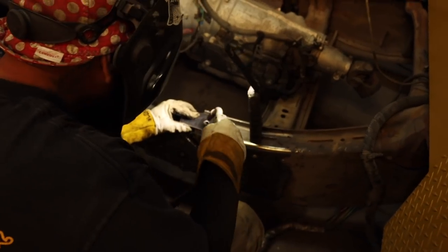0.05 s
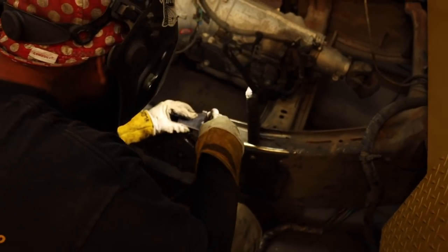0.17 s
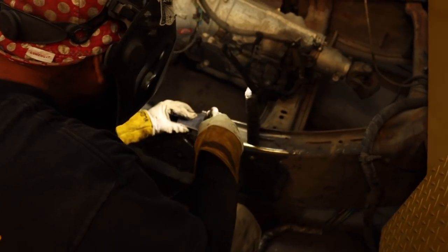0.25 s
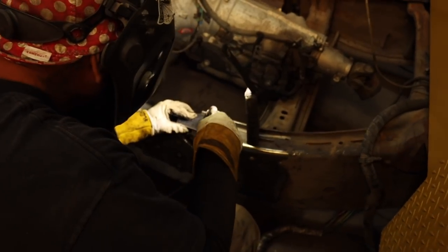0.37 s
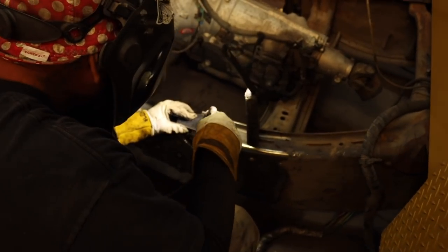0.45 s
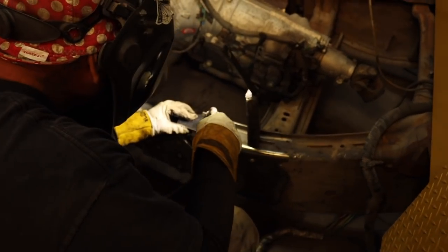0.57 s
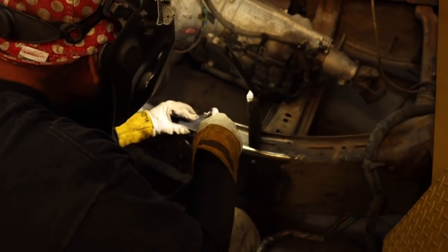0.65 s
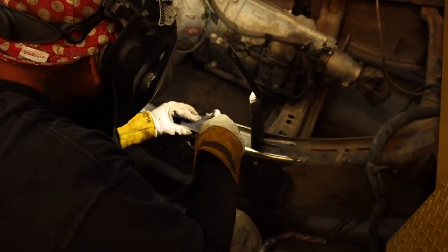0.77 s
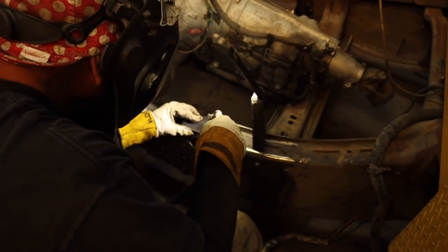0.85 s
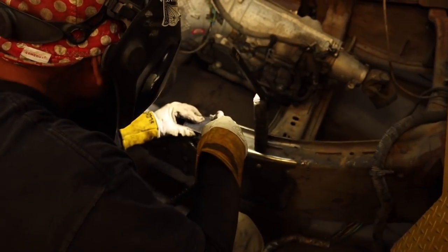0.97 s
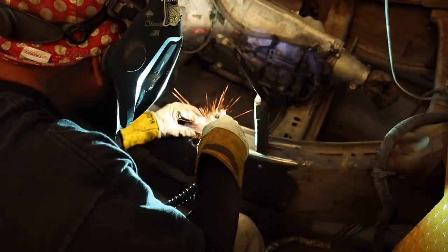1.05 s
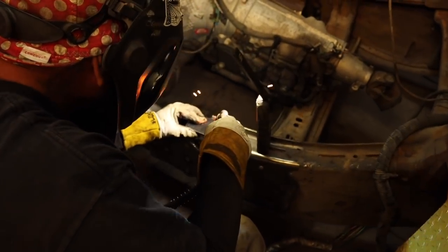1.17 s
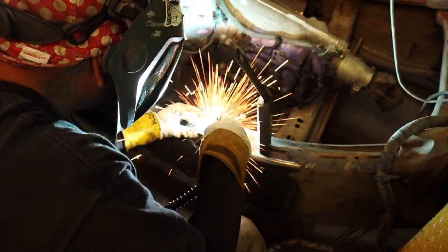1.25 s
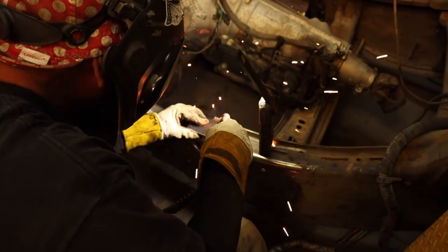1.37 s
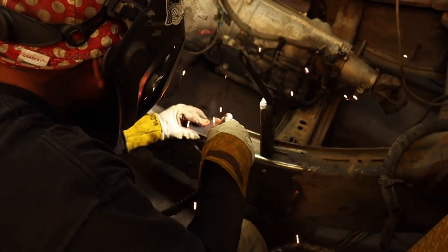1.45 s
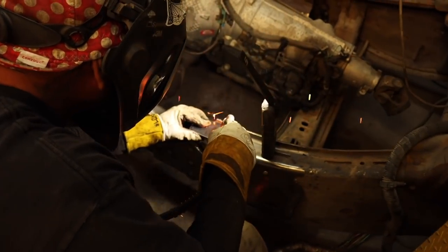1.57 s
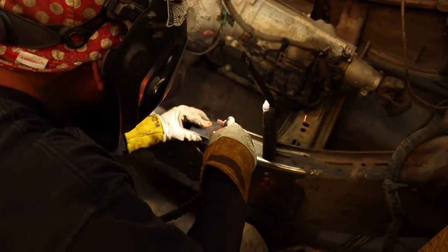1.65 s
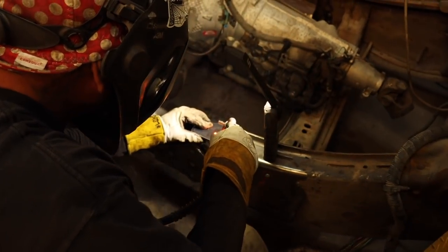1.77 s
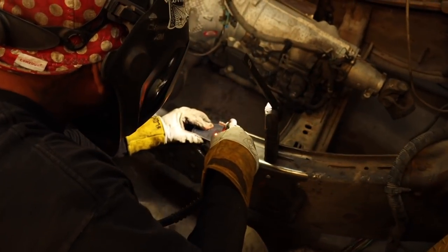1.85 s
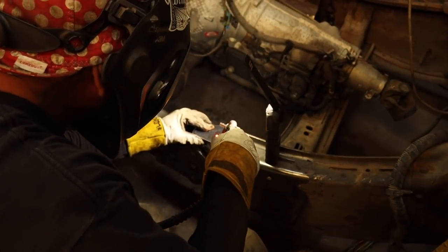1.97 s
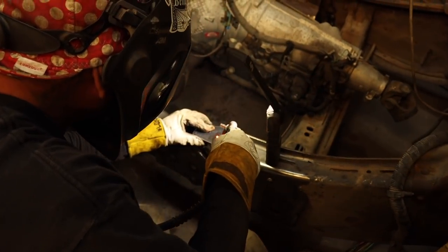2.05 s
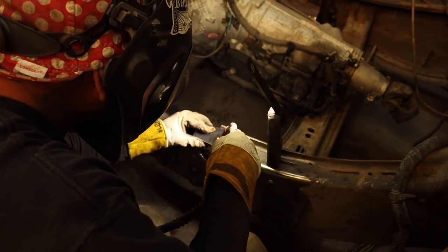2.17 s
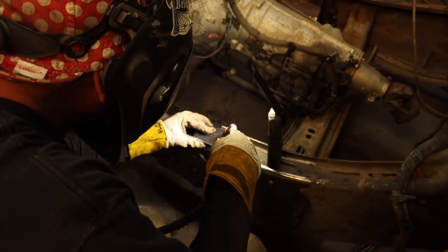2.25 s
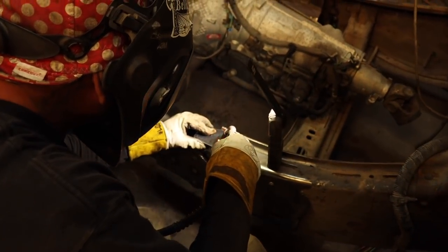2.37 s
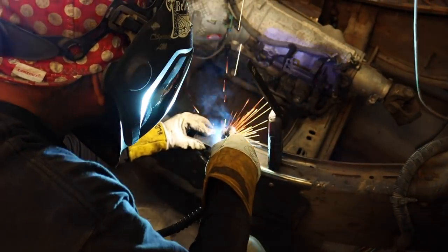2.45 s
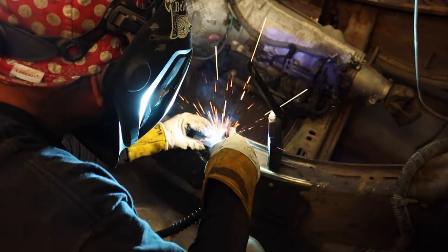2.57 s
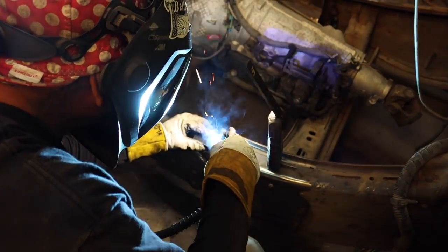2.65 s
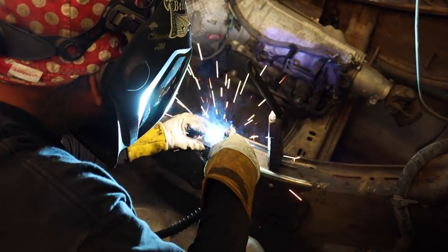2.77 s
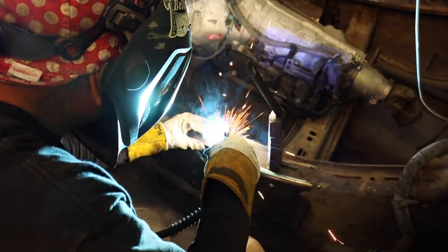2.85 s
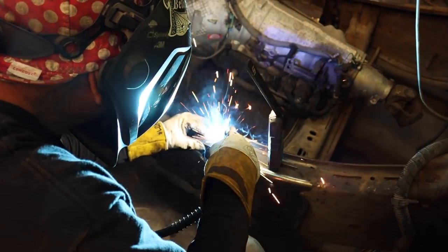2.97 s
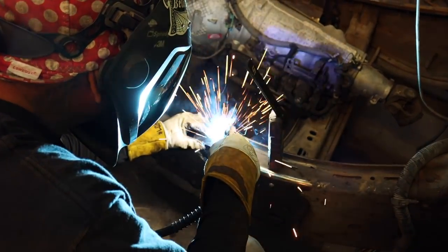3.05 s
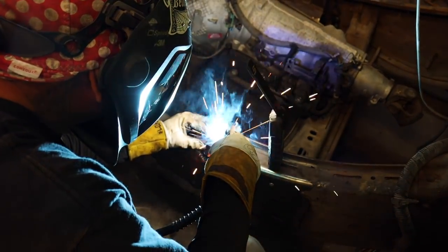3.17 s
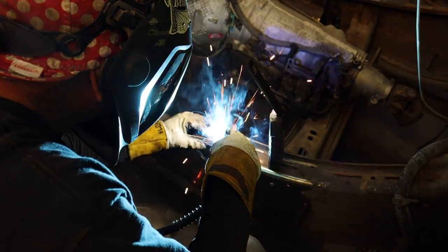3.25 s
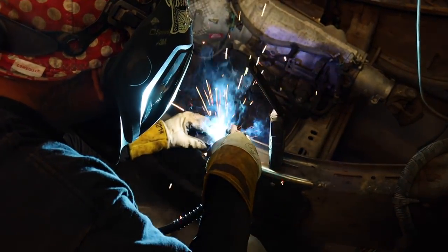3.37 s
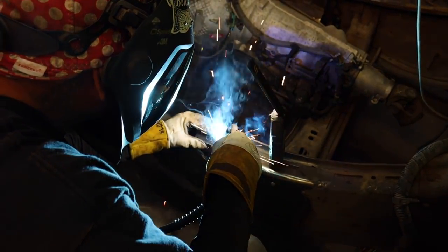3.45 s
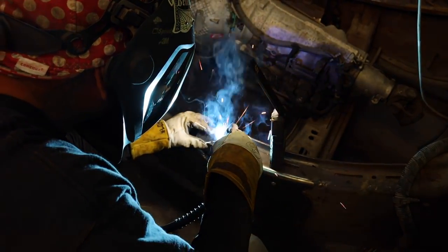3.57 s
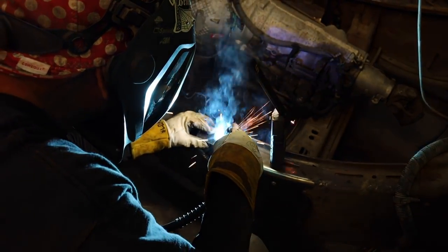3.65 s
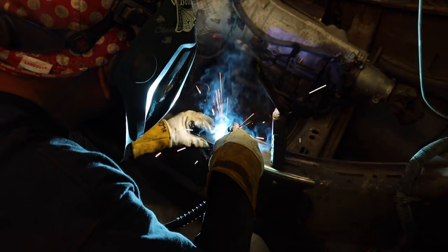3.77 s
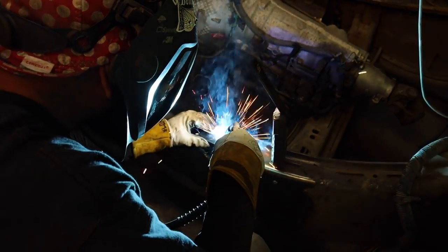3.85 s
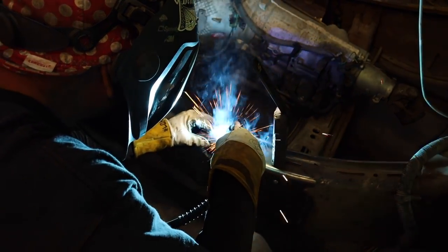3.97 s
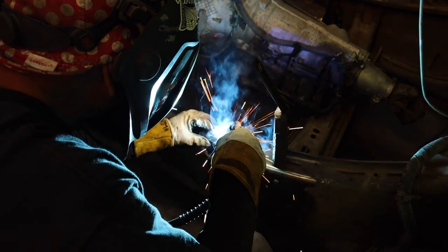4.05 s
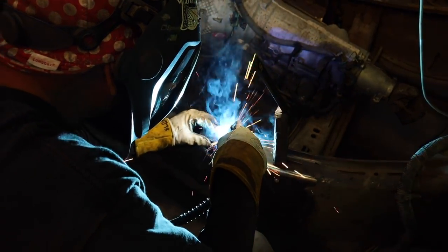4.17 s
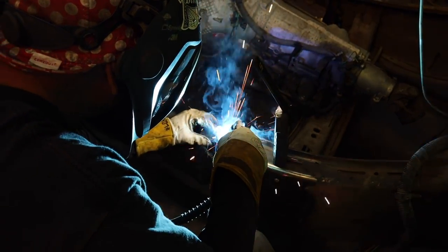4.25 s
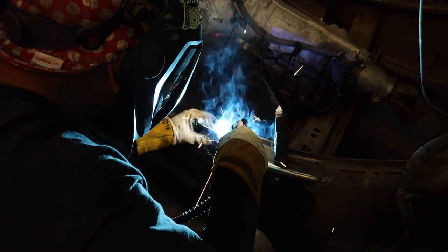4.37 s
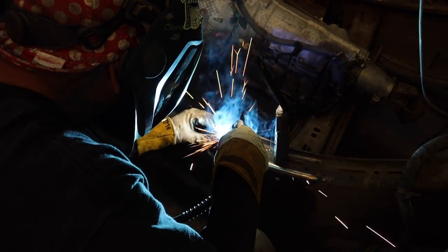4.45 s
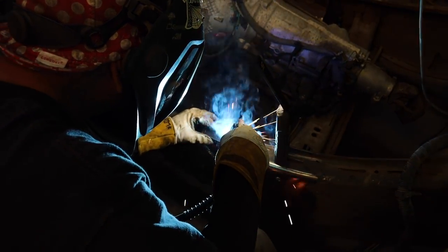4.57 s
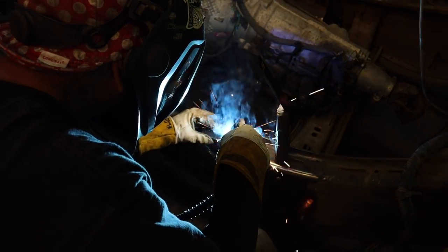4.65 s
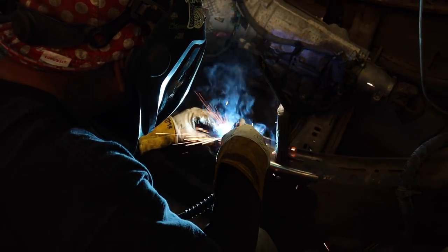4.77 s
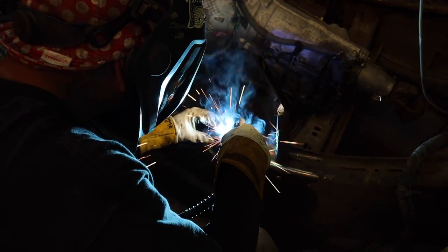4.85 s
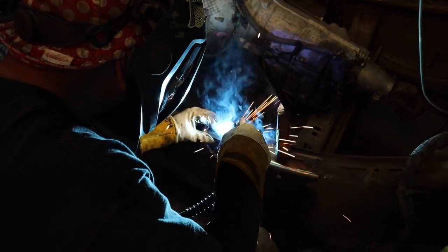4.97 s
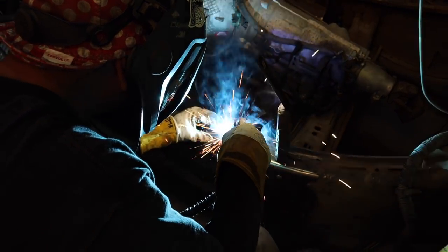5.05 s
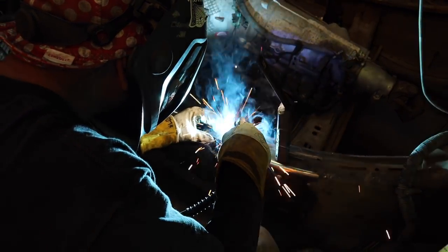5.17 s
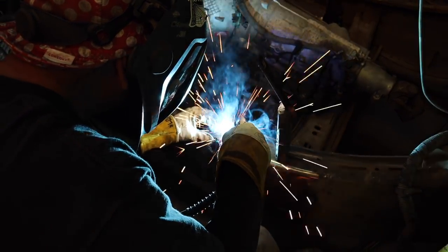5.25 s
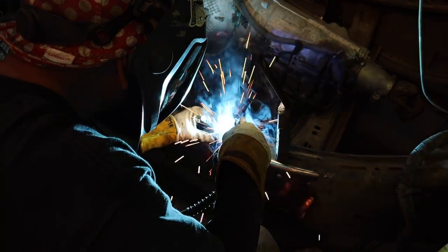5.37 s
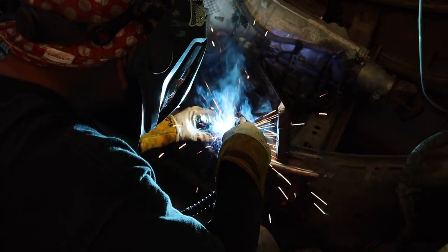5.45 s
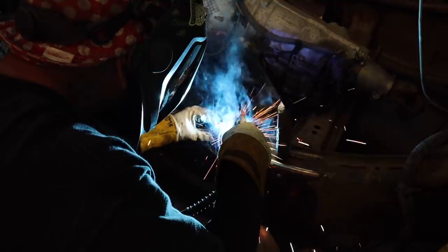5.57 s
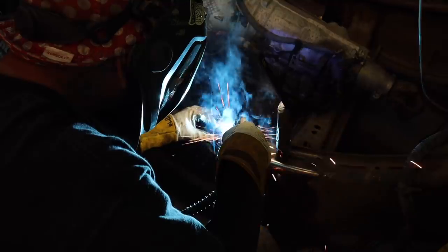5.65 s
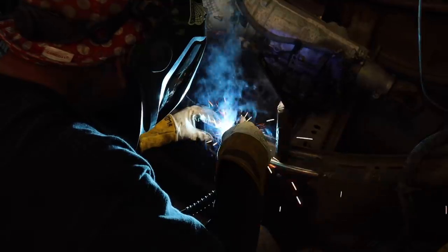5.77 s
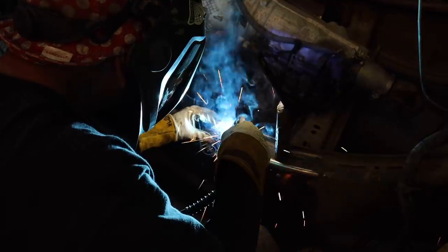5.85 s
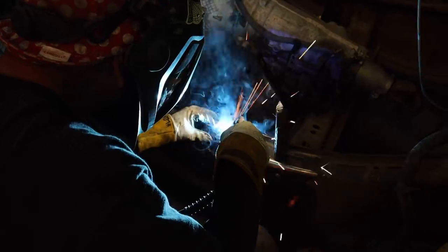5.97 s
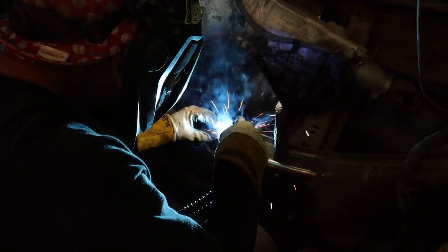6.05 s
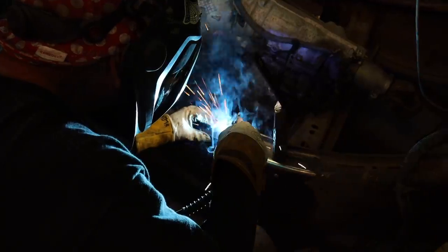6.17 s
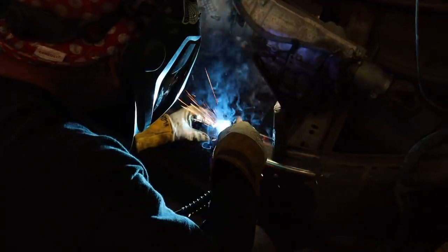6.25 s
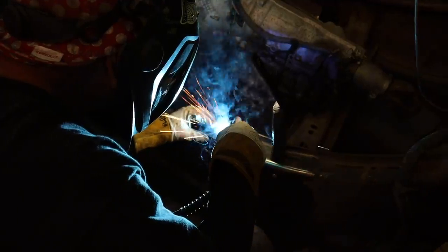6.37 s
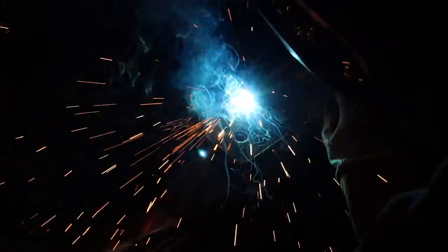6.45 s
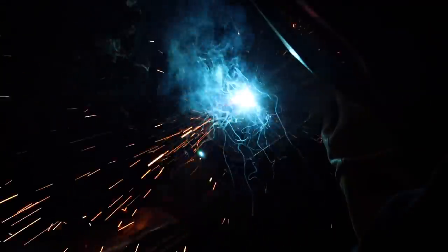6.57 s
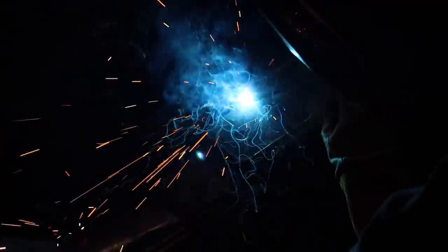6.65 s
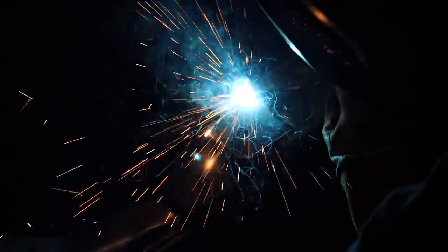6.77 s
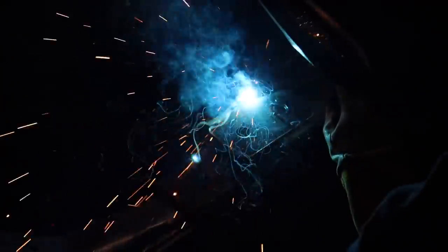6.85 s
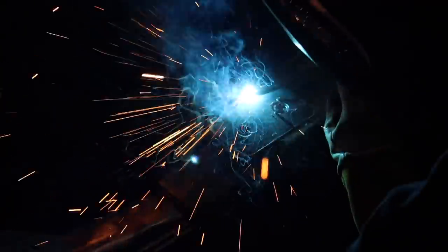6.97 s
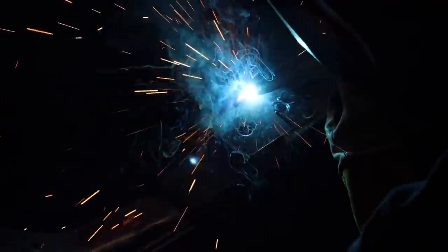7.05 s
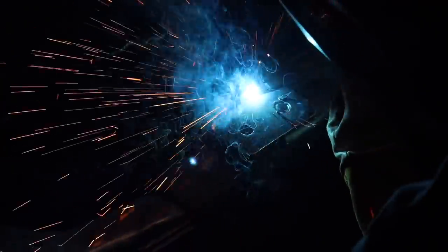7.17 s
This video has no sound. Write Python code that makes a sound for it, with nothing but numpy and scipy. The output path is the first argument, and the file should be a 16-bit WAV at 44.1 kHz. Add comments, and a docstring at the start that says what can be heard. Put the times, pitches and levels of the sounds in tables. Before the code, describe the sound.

An arc welder hisses and pops in two false starts, then crackles and sizzles steadily on steel, close by, over a faint fan.

```python
"""A garage: wire-feed arc welding on a steel vehicle frame, close by, over a humming fan.
Gas hisses, two false starts pop and sizzle out, then the arc catches. Each drop of wire shorts and
blows apart with a crack; the arc frizzles in between. The cracks ring between the steel parts and
overload the microphone. The weld is heard from beside the welder, at the end facing the arc."""
import sys
import numpy as np
from scipy import signal
from scipy.fft import rfft, irfft
from scipy.io import wavfile
from scipy.ndimage import uniform_filter1d

SR = 44100
rng = np.random.default_rng(int(sys.argv[2]) if len(sys.argv) > 2 else 0)


def wrap_up_sound(samples):
    """Save the sound to the file named by the first command line argument, as 16-bit audio."""
    columns = np.atleast_2d(samples).T
    # keep every value between -1 and 1, then stretch to whole-number steps
    tamed = np.clip(columns, -1, 1)
    steps = np.round(tamed * 32767).astype(np.int16)
    wavfile.write(sys.argv[1], SR, steps)


N = 317520
T = np.arange(N) / SR
CATCH_S, TURN_S = 2.5, 6.487  # arc catches; listener faces it

# false starts and big drops: (time [s], strength [dB])
BIG_POPS = [(1.0966, 17.5), (1.2922, 25.5), (2.4694, 22), (2.4917, 19.5), (2.5796, 17), (2.6446, 19.5),
            (2.7199, 23), (2.7378, 21), (2.7581, 21), (2.7962, 13.5), (2.8465, 20), (2.88, 21.5),
            (2.8933, 21), (2.961, 15), (2.9981, 20), (3.023, 21), (3.0467, 18.5), (3.0874, 19),
            (3.1628, 14.5), (3.2299, 21), (3.271, 20), (3.3356, 15), (3.3885, 18.5), (3.4787, 14.5),
            (3.5552, 9), (3.6366, 11.5), (3.665, 17.5), (3.8127, 15), (3.8327, 16.5), (3.8641, 19),
            (3.906, 16), (4.1817, 18.5), (4.2873, 19.5), (4.3289, 20.5), (4.4167, 19), (4.47, 25),
            (4.5477, 16), (4.688, 17), (4.7126, 20), (4.7424, 17.5), (4.8649, 13), (5.0042, 20),
            (5.179, 12.5), (5.2045, 13.5), (5.5211, 17), (5.6367, 20.5), (5.9582, 22), (6.0247, 18.5),
            (6.1333, 19), (6.241, 17.5), (6.3056, 18.5), (6.3884, 21.5), (6.4319, 18), (6.4773, 15),
            (6.8601, 20.5), (7.0515, 20)]
# wire feed: (time [s], drop rate [1/s], crack strength [dB])
WIRE_FEED = [(2.6, 135, 11), (2.94, 120, 12), (3.01, 42, 14), (3.11, 110, 11), (3.35, 66, 13),
             (3.62, 43, 9.5), (3.94, 40, 9), (4.059, 60, 11), (4.43, 68, 13.5), (4.62, 70, 11),
             (4.8, 52, 16), (5.12, 62, 9), (5.58, 72, 12), (5.82, 72, 13), (6.16, 62, 14.5), (6.27, 46, 16),
             (6.45, 46, 13.5), (6.55, 72, 11.5), (6.7, 76, 10.5), (6.79, 120, 11.5), (6.95, 92, 12),
             (7.2, 76, 12)]
# wire stalls: (start [s], end [s], frizzle change [dB])
WIRE_STALLS = [(2.495, 2.564, -15), (2.649, 2.7, -9), (2.8, 2.826, -5), (2.848, 2.878, -1),
               (3.166, 3.22, 2.5), (4.51, 4.545, -0.5), (4.826, 4.863, -3)]
# spatter landing: (time [s], strength [dB])
SPATTER_TICKS = [(1.234,-11.5), (1.266,-18), (1.336,-7), (2.112,-31)]
# source spectra: (frequency [Hz], relative density [dB])
ARC_BESIDE_SPECTRUM = [(60,-4), (300,-1), (550,0.5), (1000,1), (5000,0), (9000,2), (16000,-3.5)]
ARC_FACING_SPECTRUM = [(25,-12), (85,11.5), (400,0), (1400,2), (5000,-6), (8000,4.5), (16000,3.5)]
SPARK_SPECTRUM = [(500,-10.5), (1000,-1), (1500,-9.5), (2000,-11), (3000,0.5), (4200,0), (5300,-8),
                  (7500,-9), (11000,-25.5), (16000,-38.5)]
GAS_SPECTRUM = [(300, -29.5), (900, -3.5), (1200, -2), (1500, 6.5), (2000, -3), (2500, -3.5), (4000, 0.5),
                (6300, -2.5), (9000, -12), (12000, -19.5), (16000, -26)]
FAN_SPECTRUM = [(20,-24.5), (32,-22), (60,-15.5), (100,-20.5), (170,-12.5), (280,-14), (380,-15), (520,-13),
                (900,-8.5), (1400,-22), (2000,-26), (3200,-31.5), (5000,-43), (8000,-50.5), (16000,-52)]
# resonances from arc to microphone: (frequency [Hz], width [Hz], relative level [dB])
BESIDE_MODES = [(100,210,-33.5), (619,220,-21), (1200,243,-12), (1533,240,-10.5), (1823,154,-13),
                (2330,270,-9), (2775,170,-10.5), (3230,133,-7.5), (3678,156,-8.5), (4090,250,-13.5),
                (4614,297,-6), (4800,212,-3.5), (5030,285,-2), (5450,493,-6.5), (6010,197,-8),
                (6147,185,-12.5), (7417,315,-11), (7700,360,-11), (8670,310,-13), (9210,230,-14.5),
                (9800,284,-14.5), (10640,520,-17), (10930,400,-15.5), (12000,650,-16), (14100,680,-20.5),
                (15070,430,-26)]
FACING_MODES = [(120,260,-18.5), (1000,300,-11.5), (1379,280,-11.5), (1800,130,-8.5), (2800,190,-6.5),
                (3500,430,-13.5), (3735,150,-6.5), (4320,200,-9.5), (4820,160,-4.5), (5220,220,-1),
                (5700,540,-5), (6300,390,-9.5), (6880,780,-14.5), (8900,770,-14), (9740,260,-9),
                (10740,510,-14), (11770,700,-16), (13200,810,-13), (14450,440,-18), (15100,510,-15.5)]
# reflection spectra: (frequency [Hz], relative density [dB])
BESIDE_ECHO_SPECTRUM = [(60,-15.5), (400,-13), (900,-3), (1700,-5), (3400,1), (5300,0), (7000,-5.5),
                        (11000,-6), (16000,-19.5)]
FACING_ECHO_SPECTRUM = [(60, 1), (400, -4), (900, -5.5), (1800, -9), (3400, 3), (5400, 5.5), (7000, -4),
                        (11000, -2), (16000, -9)]
# the background sinks after the pops and under the arc: (time [s], gain [dB])
FAN_GAIN = [(1.05, 3), (1.13, -4), (1.35, -1.5), (1.5, 1.5), (2.42, 1), (2.48, -5), (3.5, -7), (3.8, -1.5),
            (4.2, -7)]
# brief dips in overall level: (time [s], half width [s], gain [dB])
LEVEL_DIPS = [(1.085, 0.0055, -15), (1.324, 0.0086, -16), (1.445, 0.0043, -18.5), (2.446, 0.0055, -18)]


def cracks(burst_s, strength_db, touch_s, crack_db=1.8, touch_db=-15.5):
    """The wire ticks on touching the pool; the bridge then bursts and spits, longer on cold steel."""
    bursts = impulses(burst_s, undb(strength_db + crack_db))
    touch_gain = undb(np.minimum(strength_db, 14) + touch_db) * (burst_s > CATCH_S)
    touches = impulses(touch_s, touch_gain) * undb(3.9 * rng.standard_normal(N))
    short_spit = spit(bursts, decay_s=.0011, gain_db=-10.5)
    cold_spit = spit(bursts * (T < CATCH_S), decay_s=.011, gain_db=-15)
    return touches - bursts + short_spit + cold_spit


def drops(big_drop_cycles=1.35, warm_up_s=.8, scatter_db=1.7, restrike_s=.012, max_drops=64):
    """Burst times [s] and strengths [dB]: small drops fall unevenly between the big pops."""
    cycles = np.cumsum(feed(T)[0]) / SR
    edges_s = [s for s, _ in BIG_POPS if s > CATCH_S] + [T[-1]]
    draws = rng.standard_normal((len(edges_s), 2, max_drops))
    bursts = list(BIG_POPS)
    for start_s, end_s, (wait, strength) in zip(edges_s, edges_s[1:], draws):
        first, last = np.interp([start_s, end_s], T, cycles)
        count = max(int(round(last - first - big_drop_cycles)), 0)
        jitter = .14 + .35 * np.exp((CATCH_S - start_s) / warm_up_s)  # steadies as the steel heats
        grown = np.cumsum(np.append(np.exp(jitter * wait[:count]), big_drop_cycles))
        times_s = np.interp(first + (last - first) * grown[:-1] / grown[-1], cycles, T)
        levels_db = feed(times_s)[1] + scatter_db * strength[:len(times_s)]
        bursts += [(s, db) for s, db in zip(times_s, levels_db)
                   if not any(stop < s < resume + restrike_s for stop, resume, _ in WIRE_STALLS)]
    return np.transpose(bursts)


def feed(times_s):
    """Drop rate [1/s] and crack strength [dB] set by the wire feed."""
    at_s, rate_hz, strength_db = np.transpose(WIRE_FEED)
    return np.interp(times_s, at_s, rate_hz), np.interp(times_s, at_s, strength_db)


def spit(bursts, decay_s, gain_db):
    """A fading rush of noise behind each burst."""
    decay = np.exp(-2 / (decay_s * SR))
    power = signal.lfilter([1 - decay], [1, -decay], bursts ** 2 + 1e-18)
    return undb(gain_db) * np.sqrt(power) * rng.standard_normal(N)


def thumps(burst_s, strength_db, growth=2.77, cutoff_hz=85):
    """A low thump under each crack, growing steeply with its strength."""
    pulses = impulses(burst_s, undb(24 + growth * (np.minimum(strength_db, 21) - 20.5)))
    return butterworth(pulses + 1e-18, 1, cutoff_hz)


def arc(burst_s, touch_s, ripple_hz=120, flutter_db=2, shorted_db=-7):
    """Grainy frizzle; throbs with the rectified mains, drops while the wire is shorted."""
    grains = grainy_noise(spread_db=5.5)
    beside, facing = colour(grains, ARC_BESIDE_SPECTRUM), colour(grains, ARC_FACING_SPECTRUM)
    frizzle = np.where(T < TURN_S, beside, facing)
    ones = np.ones(len(burst_s))
    shorted = np.cumsum(impulses(touch_s, ones) - impulses(burst_s, ones))
    throb = 1 + .28 * np.sin(2 * np.pi * ripple_hz * T)
    return frizzle * arc_gain() * throb * undb(flutter_db * drift(220) + shorted_db * shorted)


def arc_gain(offset_db=-38, db_per_octave=4.5, facing_db=6, fade_s=.008):
    """Frizzle grows with drop strength and rate, and with the arc in view; most stalls cut it."""
    rate_hz, strength_db = feed(T)
    feed_db = strength_db + db_per_octave * np.log2(rate_hz / rate_hz.mean())
    stall_db = sum(db * (ramp(start, fade_s) - ramp(end, fade_s)) for start, end, db in WIRE_STALLS)
    return undb(offset_db + feed_db + stall_db + facing_db * (T >= TURN_S)) * (T > CATCH_S)


def spatter():
    """Spatter lands with small ticks."""
    times_s, strength_db = np.transpose(SPATTER_TICKS)
    return impulses(times_s, undb(strength_db))


def sparks(peak_s=1.325, attack_s=.02, peak_db=-23.5, fade_db_per_s=51, cool_s=.15):
    """Burning droplets sizzle after the second false start; treble dies first as they cool."""
    fizz = colour(grainy_noise(spread_db=4), SPARK_SPECTRUM)
    dull = butterworth(fizz, 3, 4800)
    age_s = np.maximum(T - peak_s, 0)
    envelope = ramp(peak_s - attack_s, attack_s) * undb(peak_db - fade_db_per_s * age_s)
    return (dull + np.exp(-age_s / cool_s) * (fizz - dull)) * envelope


def gas():
    """Shielding gas hisses from the nozzle on two trigger pulls."""
    flow = gas_flow(.938, hold_s=.14, level_db=-29.5) + gas_flow(2.367, hold_s=.086, level_db=-30.5)
    return colour(rng.standard_normal(N), GAS_SPECTRUM) * flow * undb(.64 * drift(90))


def gas_flow(start_s, hold_s, level_db, attack_s=.05, release_s=.01, trickle_s=.2, trickle_db=-12.5):
    """Envelope of one pull: a rush, then a trickle."""
    rush = 1 - ramp(start_s + hold_s, release_s)
    trickle = undb(trickle_db) * (1 - ramp(start_s + hold_s + trickle_s, release_s))
    return undb(level_db) * ramp(start_s, attack_s) * np.maximum(rush, trickle)


def garage(x, modes, spectrum, bounce_s, bounce_db, frame_db, room_db):
    """Direct ring, a bright bounce off steel, quick echoes off frame and floor, then the room."""
    direct = steel_ring(modes)
    response = undb(frame_db) * echoes(spectrum, start_s=.00065, t60_s=.035, spread_db=3.5)
    response += undb(room_db) * echoes(spectrum, start_s=.005, t60_s=.32, spread_db=2.5)
    lag = int(bounce_s * SR)
    response[:len(direct)] += direct
    response[lag:lag + len(direct)] += undb(bounce_db) * butterworth(direct, 2, 6500, "high")
    return signal.oaconvolve(x, response)[:N]


def steel_ring(modes, size=4096):
    """Impulse response of the resonances between the steel parts; energy 1."""
    f_hz = np.fft.rfftfreq(size, 1 / SR) + 1
    transfer = sum((-1) ** k * undb(db) / (1 + 1j * (f_hz / hz - hz / f_hz) * hz / width_hz)
                   for k, (hz, width_hz, db) in enumerate(modes))
    cepstrum = irfft(np.log(abs(transfer)))
    cepstrum[1:size // 2] *= 2  # fold to minimum phase: sharp front
    cepstrum[size // 2 + 1:] = 0
    response = irfft(np.exp(rfft(cepstrum)))[:size // 2]
    return response / np.linalg.norm(response)


def echoes(spectrum, start_s, t60_s, spread_db, damp_hz=5500, treble_s=.13):
    """Decaying cloud of uneven reflections; treble dies first; energy 1."""
    t = T[:SR]
    taps = colour(grainy_noise(spread_db, SR), spectrum)
    cloud = taps * np.clip(t / start_s - 1, 0, 1) * undb(-60 * t / t60_s)
    dull = butterworth(cloud, 2, damp_hz)
    response = dull + np.exp(-t / treble_s) * (cloud - dull)
    return response / np.linalg.norm(response)


def fan(blade_hz=202.5, waver_hz=5):
    """Rushing air and a wavering blade hum."""
    air = colour(rng.standard_normal(N), FAN_SPECTRUM) * undb(-42.5 + .66 * drift(7.7))
    phase = 2 * np.pi * np.cumsum(blade_hz + waver_hz * drift(35)) / SR
    hum = np.sqrt(2) * np.sin(phase) * undb(-48 + 3.1 * drift(28))
    return (air + hum) * undb(np.interp(T, *np.transpose(FAN_GAIN)))


def undb(db):
    """Decibels to gain."""
    return 10 ** (np.asarray(db) / 20)


def unit_rms(x):
    """Scale to rms 1."""
    return x / np.sqrt(np.mean(x ** 2))


def colour(x, spectrum):
    """Shape by (frequency [Hz], gain [dB]) rows; rms 1."""
    hz, db = np.transpose(spectrum)
    f_hz = np.fft.rfftfreq(len(x), 1 / SR) + 1
    gain = undb(np.interp(np.log(f_hz), np.log(hz), db))
    return unit_rms(irfft(rfft(x) * gain, len(x)))


def butterworth(x, order, cutoff_hz, kind="low"):
    """Causal low- or high-pass."""
    return signal.sosfilt(signal.butter(order, cutoff_hz, kind, fs=SR, output="sos"), x)


def grainy_noise(spread_db, size=N):
    """White noise with a random gain per sample."""
    return rng.standard_normal(size) * undb(spread_db * rng.standard_normal(size))


def drift(rate_hz):
    """Smooth random drift; rms 1."""
    hold = int(SR / rate_hz)
    steps = np.repeat(rng.standard_normal(N // hold + 1), hold)
    return unit_rms(uniform_filter1d(steps, hold)[:N])


def impulses(times_s, sizes):
    """One impulse per event."""
    return np.bincount(np.clip(np.round(times_s * SR).astype(int), 0, N - 1), sizes, N)


def ramp(start_s, length_s):
    """Rise from 0 to 1, then hold."""
    return np.clip((T - start_s) / length_s, 0, 1)


def scene():
    """The weld from two angles, plus gas, sparks and fan."""
    burst_s, strength_db = drops()
    short_circuit_s = .0025 * np.exp(.18 * rng.standard_normal(N)[:len(burst_s)])
    touch_s = burst_s - short_circuit_s
    weld = cracks(burst_s, strength_db, touch_s) + arc(burst_s, touch_s) + spatter()
    beside = garage(weld * (T < TURN_S), BESIDE_MODES, BESIDE_ECHO_SPECTRUM,
                    bounce_s=.0018, bounce_db=-6, frame_db=-9.5, room_db=-19)
    facing = garage(weld * (T >= TURN_S), FACING_MODES, FACING_ECHO_SPECTRUM,
                    bounce_s=.0017, bounce_db=-7, frame_db=-8, room_db=-15.5)
    return (beside + facing + thumps(burst_s, strength_db) + gas() + sparks() + fan())[None]


def record(dry, ceiling=.85, knee=4, asymmetry=.018, sink_db=-3.5, top_hz=16000):
    """The microphone flattens the cracks; the level dips, then stays lower; the top is cut."""
    flat = dry / (1 + abs(dry / ceiling) ** knee) ** (1 / knee)
    flat = butterworth(flat + asymmetry * flat ** 2, 1, 30, "high")
    dips_db = sum(db * np.exp(-((T - s) / width_s) ** 2) for s, width_s, db in LEVEL_DIPS)
    gain = undb(dips_db + sink_db * ramp(start_s=2.43, length_s=.03))
    return signal.sosfilt(signal.ellip(10, .2, 70, top_hz, fs=SR, output="sos"), flat * gain)


dry = scene()
out = record(dry)
wrap_up_sound(out)
```